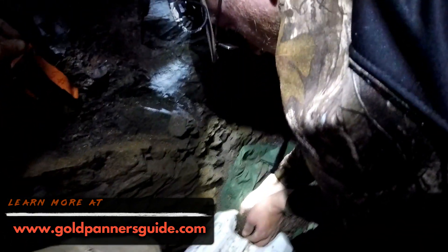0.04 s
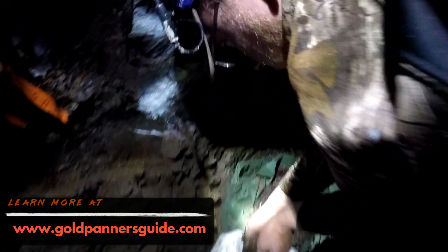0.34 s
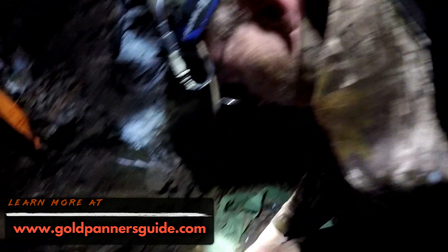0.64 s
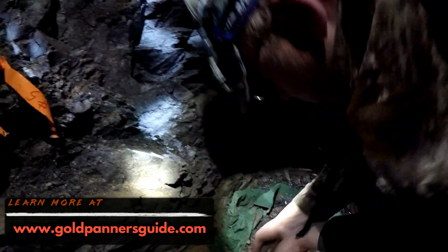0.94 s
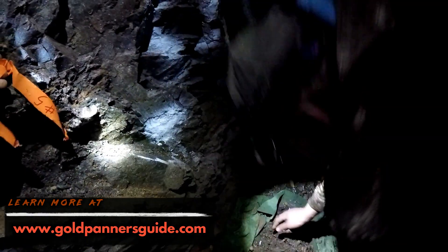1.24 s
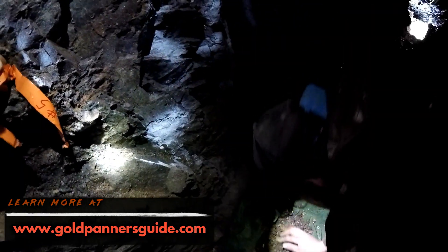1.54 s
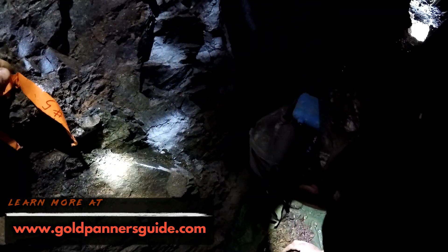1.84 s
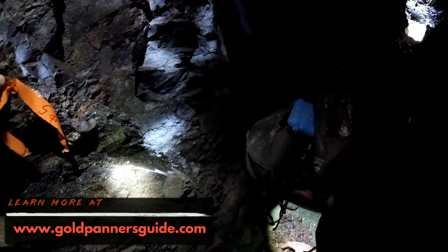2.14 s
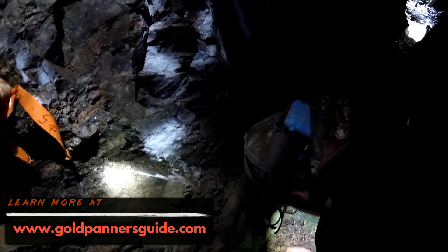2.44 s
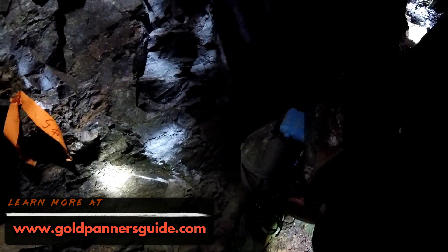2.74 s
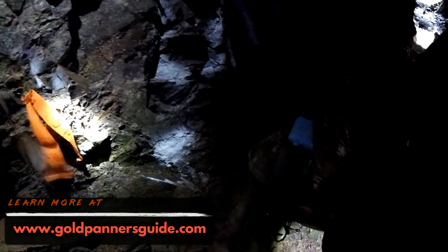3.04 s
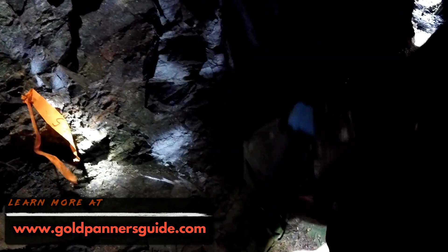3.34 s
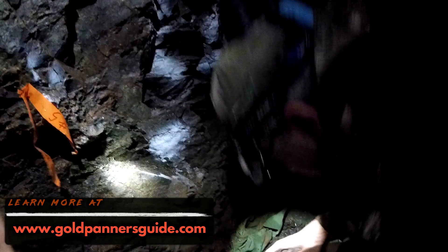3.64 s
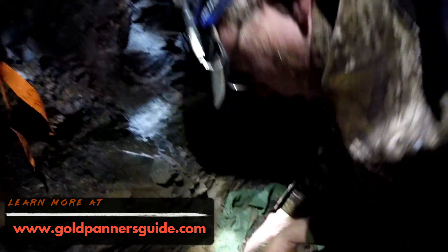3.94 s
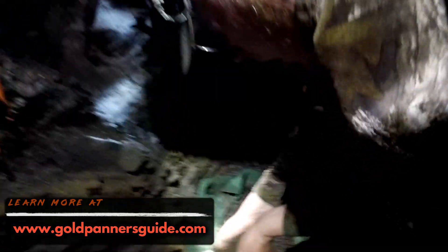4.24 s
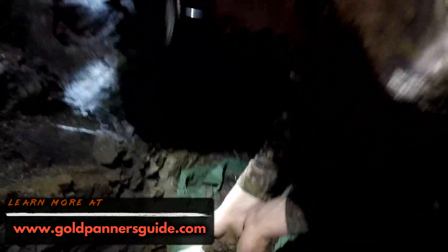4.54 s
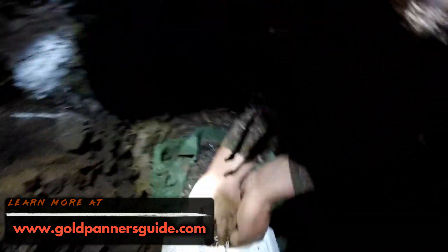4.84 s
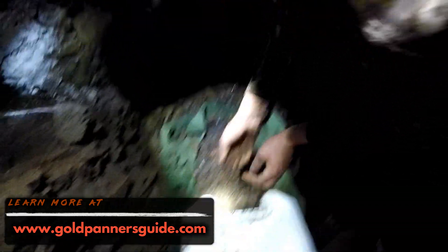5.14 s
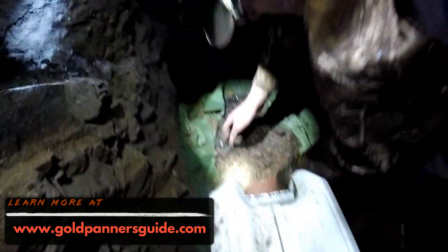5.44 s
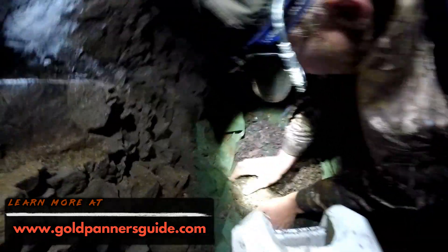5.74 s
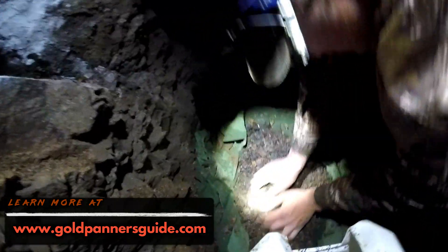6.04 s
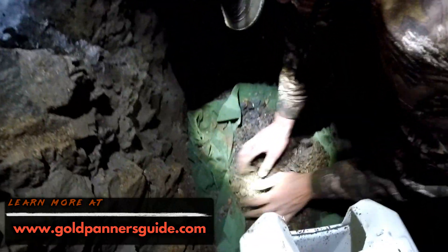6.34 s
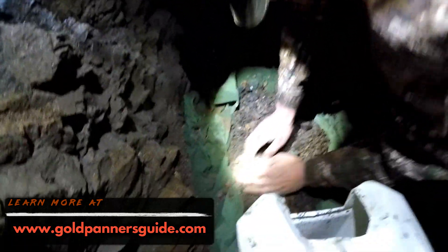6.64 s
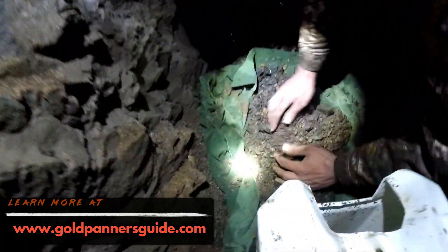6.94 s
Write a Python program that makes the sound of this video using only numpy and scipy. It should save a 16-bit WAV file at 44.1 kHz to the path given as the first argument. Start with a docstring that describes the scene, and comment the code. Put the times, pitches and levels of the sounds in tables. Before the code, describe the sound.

Close up in a narrow mine tunnel, stones clatter into a plastic tub, the heavier lumps making it boom, with a few muffled bumps underneath. A quieter stretch follows, with fingers sweeping gravel across a tarp and small chips ticking. The tub drags slightly and more handfuls rattle and thump in, before hands scrape into the pile again. The rock walls hold the low tones for seconds.

```python
"""A short scrape of grit, then handfuls of broken ore tumble into a hollow plastic container. Stones rattle on
its walls, heavy lumps make it boom, and a narrow mine tunnel holds the lows for seconds. Dull, close bumps and
a swell of rumble run under this first pour. Hands rake fine grit together on the rock floor and loose chips
click; the plastic judders as it is dragged, a second round of ore goes in, and the hands dig back into the heap
on the tarp."""
import sys
import numpy as np
from scipy import signal
from scipy.fft import rfft, irfft
from scipy.io import wavfile
from scipy.ndimage import uniform_filter1d

SR = 44100
rng = np.random.default_rng(int(sys.argv[2]) if len(sys.argv) > 2 else 0)


def dump(signal):
    """Clip the signal to [-1, 1] and save it as 16-bit WAV at the path in sys.argv[1]."""
    limited = np.clip(np.atleast_2d(signal).T, -1, 1)
    pcm = np.round(limited * 32767).astype(np.int16)
    wavfile.write(sys.argv[1], SR, pcm)


N = 307818
T = np.arange(N) / SR

# Table levels are relative: each layer gets its own trim in the mix. hand strokes, on the rock floor and later
# on the tarp: start_s, length_s, scrape_db, grit_db, depth (0 sweeping to 1 digging)
HAND_STROKES = [(0.0, 0.37, -42.5, -49.5, 0.52), (1.57, 0.056, -48.5, -54, 0),
                (1.685, 0.04, -44.5, -61, 0.41), (1.917, 0.3, -43.5, -47.5, 0),
                (2.255, 0.059, -46.5, -52.5, 0), (2.372, 0.13, -50.5, -59, 0.13),
                (2.536, 0.16, -42, -50, 0.045), (2.724, 0.34, -45, -50, 0.048),
                (3.136, 0.098, -40.5, -48, 0.043), (3.291, 0.2, -50, -54, 0), (3.458, 0.15, -49, -47.5, 0),
                (3.659, 0.032, -44, -45.5, 0.4), (3.75, 0.09, -69, -59, 0.21), (3.92, 0.12, -68, -66, 0),
                (4.08, 0.015, -39.5, -58, 0.63), (4.167, 0.088, -31.5, -49, 0.9),
                (4.337, 0.017, -43.5, -45, 0.76), (5.85, 0.23, -40.5, -61, 0.84),
                (6.101, 0.23, -32, -46, 0.9), (6.324, 0.35, -32.5, -42, 0.8),
                (6.665, 0.11, -48, -51.5, 0.39), (6.87, 0.17, -40.5, -54, 0.74)]
# handfuls running into the container: start_s, swell_s, length_s, rattle_db, grit_db, boom_db, boom_hz
POURS = [(0.154, 0.08, 0.14, -23.5, -35.5, -15.5, 162), (0.265, 0.078, 0.33, -22, -35, -12.5, 160),
         (0.609, 0.028, 0.29, -24.5, -37, -16, 161), (0.911, 0.01, 0.21, -26, -37.5, -7.5, 163),
         (1.155, 0.023, 0.21, -26.5, -39, -10.5, 160), (1.447, 0.0037, 0.012, -26.5, -41.5, -15, 158),
         (4.392, 0.18, 0.21, -21, -35.5, -13.5, 225), (4.643, 0.03, 0.26, -24, -37, -12.5, 142),
         (4.88, 0.093, 0.29, -20.5, -34.5, -9, 157), (5.21, 0.031, 0.17, -27, -41, -21, 150.6),
         (5.388, 0.012, 0.055, -29.5, -41.5, -6.5, 142)]
# modes of the container's air and walls: pitch_hz, level_db, t60_s
CONTAINER_MODES = [(132.7, -6.5, 0.87), (158.15, 2, 0.39), (186, -0.5, 0.17), (241, -4.5, 0.28),
                   (267, -5, 0.14), (345, -11, 0.63), (367, -16.5, 0.45), (454, -16, .11), (530, -23, .1)]
# lumps striking the container: start_s, clack_db, clack_hz, boom_db, boom_hz, crack_db
LUMP_HITS = [(0.161, -17.5, 800, -36, 174, -48), (0.18, -8, 798, -4, 174, -42),
             (0.234, -10.5, 993, -12, 159, -25), (0.352, -19, 1030, -6, 153, -17),
             (0.395, -10, 460, -4, 168, -31), (0.647, -9, 1784, -18, 151.2, -19.5),
             (0.934, -11.5, 520, -6, 158, -39), (0.967, -13, 557, -8, 157, -43),
             (1.001, -12.5, 530, -12, 145, -43), (1.05, -9.5, 562, -7.5, 164, -36),
             (1.16, -16, 493, -4, 160, -32), (1.241, -15, 520, -5, 150, -40),
             (1.33, -13.5, 530, 0, 161, -30), (1.451, -14, 567, -6.5, 158, -33),
             (4.175, -19.5, 553, -14.5, 272, -37), (4.349, -25, 590, -32, 207, -40),
             (4.376, -37, 490, -14.5, 207, -37), (4.389, -14.5, 807, -15.5, 149, -18.5),
             (4.4957, -11.5, 660, -8, 231, -25), (4.541, -14, 527, -12, 320, -41),
             (4.625, -14, 560, -3, 258, -31), (4.649, -11, 1440, 0.5, 134, -23),
             (4.7418, -6, 560, -1.5, 149, -23), (4.884, -7.5, 541, -8, 153, -21),
             (4.9516, -9, 503, -6.5, 155.7, -30), (5.119, -11.5, 1644, -6, 166.3, -37),
             (5.394, -10, 476, -24, 151, -34), (5.435, -14, 560, 1.5, 148, -19),
             (5.543, -17.5, 515, -23, 145, -29.5), (5.61, -8, 488, -13.5, 142, -23.5),
             (5.708, -7.5, 519, 0.5, 265, -29), (5.735, -30, 525, -0.5, 250, -53)]
# chips clicking on rock: start_s, level_db, pitch_hz
CHIP_CLICKS = [(0.1755, -22.5, 4000), (1.5813, -34, 3480), (1.6362, -38, 4450), (1.7221, -25, 5340),
               (1.7338, -33, 4880), (1.7686, -34.5, 4230), (1.8742, -41, 6450), (1.942, -37, 5994),
               (3.1742, -33, 6030), (3.5602, -29, 4200), (3.6066, -30.5, 5320), (3.675, -25, 5330),
               (3.779, -32.5, 5530), (3.8226, -34, 5900), (3.856, -39, 3900), (3.959, -39, 4480),
               (4.0871, -41, 3990), (4.112, -37, 4300), (4.338, -34, 6100), (4.387, -33, 4020),
               (4.4205, -29.5, 4140), (4.462, -25, 3720), (4.5197, -23.5, 5450), (4.633, -16, 4200),
               (4.682, -19, 4120), (4.7133, -19.5, 4160), (4.7604, -20.5, 4150), (5.026, -18, 3720),
               (5.39, -21.5, 5900), (5.654, -33, 6300), (5.705, -29, 3830), (5.7716, -40.5, 3840),
               (5.9008, -39.5, 4760), (5.9274, -42, 4400)]
# dull, close bumps: start_s, level_db
CLOSE_BUMPS = [(0.589, -5.5), (0.609, -10), (0.6741, -4), (0.688, -10), (0.73, -5.5), (0.757, -7),
               (0.789, -4.5), (0.8164, -7), (0.8368, -12.5), (0.8671, -5.5), (0.89, -9)]
# stick-slip curve of the dragged plastic: time_s, level_db, slips_per_s
DRAG_CURVE = [(4.37, -47.5, 48), (4.441, -44.5, 58.7), (4.498, -41, 57.7), (4.602, -39, 80),
              (4.656, -42, 109)]
# the tunnel's reverb: frequency_hz, t60_s, level_db, build_up_s
TUNNEL_REVERB = [(37.8, 3.3, -10, 0.35), (62, 3.5, -1.5, 0.44), (92.6, 2.35, -6, 0.11),
                 (150, 2.11, -2, 0.012), (230, 1.58, -2.5, 0.012), (312, 0.99, -8.5, 0.0033),
                 (464, 0.55, -6, 0.0011), (1100, 0.5, -6.5, 0.0015), (3000, 0.39, -11.5, 0.0065),
                 (8000, 0.41, -11.5, 0.0033)]

# EQ curves, one for each texture: frequency_hz, gain_db
SWEEP_EQ = [(80, 5.5), (180, 9.5), (380, 9.5), (650, 5.5), (950, -1.5), (1300, 1), (1900, 1), (2450, -3.5),
            (3100, -38.5), (6000, -17.5)]  # fingers skimming the dirt
DIG_EQ = [(80, -9.5), (170, 12), (250, 8), (450, 1), (650, -2), (980, 0), (1250, -6.5), (1650, -8.5),
          (2300, -18), (3100, -12), (6000, -36)]  # fingers deep in the heap
GRIT_EQ = [(1200, -12.5), (2500, 5.5), (3500, 2), (4700, 0), (5700, -0.5), (6250, 0), (7000, -8),
           (9000, -12.5), (11000, -15), (11800, -25), (13000, -17), (15000, -36)]  # bright, fine grit
AIR_EQ = [(30, 3), (90, -17.5), (170, 1.5), (350, -4), (700, -11.5), (1500, -13), (4000, -23.5),
          (6200, -23.5), (7500, -26), (11000, -32), (15000, -59)]  # the tunnel's room tone
RATTLE_EQ = [(100, -25), (300, 4), (480, 1), (650, -2.5), (950, 1.5), (1150, -2.5), (1400, -2.5),
             (1750, -0.5), (2100, -8), (2700, -9), (4000, -21.5), (8000, -52.5)]  # stones on plastic
CLACK_EQ = [(90, -40.5), (280, 8), (450, 5.5), (700, -1), (950, 2.5), (1150, -2.5), (1400, 0), (1700, -9),
            (2500, -9.5), (4000, -27), (9000, -46)]  # a lump landing on ore
SPLINTER_EQ = [(400, 3), (2000, 5), (4500, 3), (6400, 3), (7500, -3.5), (11000, -9.5), (12000, -12),
               (15000, -25)]  # chips on rock
RUMBLE_EQ = [(10, -40), (25, 10), (45, 14.5), (70, -4.5), (110, -29), (250, -16), (1000, -86)]
SLIP_TICK_EQ = [(9000, -49), (11300, -25), (12000, -1), (14000, -8), (15500, -9)]
SLIP_KNOCK_EQ = [(150, 2.5), (280, -0.5), (420, -7.0), (700, -19.5), (3000, -30), (9000, -60)]


def undb(db):
    """Decibels to gain."""
    return 10 ** (np.asarray(db) / 20)


def unit(x):
    """Scale to rms 1."""
    return x / np.sqrt(np.mean(x ** 2))


def fade(t60):
    """One second of exponential decay."""
    return np.exp(-np.log(1000) * T[:SR] / t60)


def ring(hz, t60):
    """One struck resonance: a dying sine."""
    return np.sin(2 * np.pi * hz * T[:SR]) * fade(t60)


def burst(t60):
    """The crunch of one contact: a quickly dying spray of noise."""
    return rng.standard_normal(SR) * fade(t60)


def add(out, start_s, sound):
    """Mix a sound in at its cue."""
    i = max(int(start_s * SR), 0)
    out[i:i + len(sound)] += sound[:N - i]


def colour(x, eq, size=2048):
    """Shape a sound with an EQ curve, as a minimum-phase filter of unit energy."""
    hz, db = np.transpose(eq)
    grid_hz = np.linspace(1, SR / 2, size + 1)
    gain = undb(np.interp(np.log(grid_hz), np.log(hz), db))
    cepstrum = irfft(np.log(gain))[:size]
    cepstrum[1:] *= 2
    response = irfft(np.exp(rfft(cepstrum, 2 * size)))[:size]
    return signal.oaconvolve(x, response / np.linalg.norm(response))[:len(x)]


def gesture(start_s, length_s, rise_s, sag_db_per_s, fall_s):
    """Envelope of one movement: it swells, holds while sagging a little, and dies away."""
    age = T[:SR]
    attack = np.clip(age / rise_s, 0, 1)
    sag = undb(-sag_db_per_s * np.minimum(age, length_s))
    release = np.exp(-np.maximum(age - length_s, 0) / fall_s)
    out = np.zeros(N)
    add(out, start_s, attack * sag * release)
    return out


def clumps(per_s, depth_db):
    """A gain that wanders in smoothed random steps, like loose ore moving in little slides."""
    steps = np.repeat(rng.standard_normal(N // 100), int(SR / per_s))[:N]
    return undb(depth_db * uniform_filter1d(steps, size=150))


def impacts(per_s, spread_db):
    """Random collisions: many small ones, a few large."""
    count = int(per_s * N / SR)
    when, size = rng.random((count, 2)).T
    heft = undb(spread_db * np.minimum(-np.log(1 - size), 4))
    polarity = (-1) ** np.arange(count)
    return np.bincount((when * N).astype(int), heft * polarity, N)


def gravel(per_s, spread_db, cycles, ring_gain, sizes=24):
    """Stones of many sizes collide; each ticks and rings for a few cycles at its own pitch."""
    out, t = 0, T[:1500]
    for hz in np.geomspace(600, 11000, sizes) * rng.uniform(.94, 1.06, sizes):
        stone = ring_gain * hz / SR * np.sin(2 * np.pi * hz * t) * np.exp(-hz * t / cycles)
        stone[0] += 1  # the tick
        out = out + signal.oaconvolve(impacts(per_s / sizes, spread_db), stone)[:N]
    return out


def raking():
    """Fingers push dense fine grit about; digging into the heap sounds deeper than sweeping."""
    sweep, dig, grit = np.zeros((3, N))
    for start_s, length_s, scrape_db, grit_db, depth in HAND_STROKES:
        # the hand speeds up, eases off, and the grit settles
        speed = gesture(start_s, length_s, rise_s=0.41 * length_s, sag_db_per_s=10, fall_s=0.045)
        sweep += (1 - depth) * undb(scrape_db) * speed
        dig += depth * undb(scrape_db) * speed
        grit += undb(grit_db) * speed
    coarse = gravel(per_s=3000, spread_db=4.5, cycles=3.0, ring_gain=5.2)
    fine = gravel(per_s=6000, spread_db=3.5, cycles=10.3, ring_gain=0.79)
    scrape = sweep * unit(colour(coarse, SWEEP_EQ)) + dig * unit(colour(coarse, DIG_EQ))
    sizzle = grit * unit(colour(fine, GRIT_EQ))
    return clumps(per_s=30, depth_db=0.5) * (scrape + sizzle)


def room_tone():
    """The tunnel's still air: a faint, steady bed of dark noise."""
    return undb(-50) * unit(colour(rng.standard_normal(N), AIR_EQ))


def rumble():
    """A faint sub rumble sits under everything and swells for as long as the bumps last."""
    lows = unit(colour(rng.standard_normal(N), RUMBLE_EQ))
    first_s, last_s = CLOSE_BUMPS[0][0], CLOSE_BUMPS[-1][0]
    swell = gesture(first_s, last_s - first_s, rise_s=0.15, sag_db_per_s=12.5, fall_s=0.028)
    return (undb(-53) + undb(-20.5) * swell) * lows


def container_boom(pitch_hz, focus_db):
    """A blow wakes mostly the container's modes near its own pitch, set by where and how it lands."""
    modes = np.array([undb(db) * ring(hz, t60) for hz, db, t60 in CONTAINER_MODES])
    mode_hz, mode_db, _ = np.transpose(CONTAINER_MODES)
    share = undb(-focus_db * np.log2(mode_hz / pitch_hz) ** 2)
    return share @ modes / np.linalg.norm(share * undb(mode_db))


def pouring():
    """A stream of ore rattles on the plastic and keeps the hollow booming."""
    slides = clumps(per_s=45, depth_db=2.15)
    coarse = gravel(per_s=750, spread_db=1.5, cycles=8.9, ring_gain=1.6)
    fine = gravel(per_s=4900, spread_db=1.5, cycles=6.9, ring_gain=1.4)
    rattle = unit(slides * colour(coarse, RATTLE_EQ))
    grit = unit(slides * colour(fine, GRIT_EQ))
    blows = impacts(per_s=500, spread_db=4.5)
    out = np.zeros(N)
    for start_s, swell_s, length_s, rattle_db, grit_db, boom_db, boom_hz in POURS:
        # the stream thins as the hand empties, then trickles out
        flow = gesture(start_s, length_s, swell_s, sag_db_per_s=5.5, fall_s=0.055)
        boom = signal.oaconvolve(blows, container_boom(boom_hz, focus_db=18))[:N]
        # level the boom: the weight of the stream drives it, not single stones
        boom /= np.sqrt(uniform_filter1d(boom ** 2, size=2000) + 1e-9)
        out += flow * (undb(rattle_db - 2) * rattle + undb(grit_db) * grit + undb(boom_db - 3.5) * boom)
    return out


def lumps():
    """Each heavy piece cracks, clacks at its own pitch on the ore below and thumps the container."""
    clack, crack, body = np.zeros((3, N))
    snap = 7.9 * signal.unit_impulse(SR)
    for start_s, clack_db, clack_hz, boom_db, boom_hz, crack_db in LUMP_HITS:
        add(clack, start_s, undb(clack_db) * (snap + burst(t60=0.11)))  # hard hit, spray of crumbs
        add(crack, start_s, undb(crack_db) * burst(t60=0.028))
        add(body, start_s, undb(clack_db - 7) * ring(clack_hz, t60=0.06))
        add(body, start_s, undb(boom_db - 5) * container_boom(boom_hz, focus_db=27))
    return undb(-7) * colour(clack, CLACK_EQ) + undb(-4) * colour(crack, GRIT_EQ) + body


def chips():
    """Small splinters crunch, ring very briefly and skid."""
    out = np.zeros(N)
    for start_s, level_db, pitch_hz in CHIP_CLICKS:
        crunch, skid = burst(t60=0.0075), burst(t60=0.025)
        ping = ring(pitch_hz, t60=0.007)
        add(out, start_s, undb(level_db) * (crunch + undb(2.5) * (skid + ping)))
    return undb(-8) * colour(out, SPLINTER_EQ)


def bumps(sweep_hz=1800, floor_hz=28, glide_s=0.00021):
    """In a bending shell the highs arrive first, so each bump sweeps down into a thud."""
    hz = floor_hz + sweep_hz / (1 + T[:SR] / glide_s)
    thud = np.sin(2 * np.pi * np.cumsum(hz) / SR) * fade(t60=0.1)
    out = np.zeros(N)
    for start_s, level_db in CLOSE_BUMPS:
        add(out, start_s, undb(level_db) * thud)
    return out


def judder():
    """Dragged plastic sticks and slips unevenly: each slip gives a thin, high tick and a small knock."""
    time_s, level_db, slips_per_s = np.transpose(DRAG_CURVE)
    rate = np.interp(T, time_s, slips_per_s) * clumps(per_s=76, depth_db=4)
    force = np.interp(T, time_s, undb(level_db), left=0, right=0) * clumps(per_s=120, depth_db=4)
    slip_count = np.floor(np.cumsum(rate) / SR)
    slips = np.diff(slip_count, prepend=0) * force * np.sqrt(SR / np.mean(slips_per_s))
    return undb(-11) * colour(slips, SLIP_TICK_EQ) + undb(23.5) * colour(slips, SLIP_KNOCK_EQ)


def tunnel(x, bands=22):
    """Rock walls return a diffuse echo: treble dies quickly, the lows come late and roll on."""
    hz, *columns = np.transpose(TUNNEL_REVERB)
    t = T[:4 * SR]
    edges = np.geomspace(25, 16000, bands + 1)
    spectrum = rfft(rng.standard_normal(len(t)))
    bin_hz = np.arange(len(spectrum)) * SR / len(t)
    echo = np.zeros(len(t))
    for lo, hi in zip(edges, edges[1:]):
        t60, level_db, build_s = (np.interp(np.log(lo * hi) / 2, np.log(hz), c) for c in columns)
        band = irfft(spectrum * ((bin_hz >= lo) & (bin_hz < hi)))
        band *= np.exp(-np.log(1000) * t / t60) * (1 - np.exp(-t / build_s)) ** 2
        echo += band / np.linalg.norm(band) * np.sqrt(2 * (hi - lo) / SR) * undb(level_db)
    return signal.fftconvolve(x, echo)[:N]


def scene():
    """Mix the close ore and bumps with their tunnel reverb, over rumble and room tone."""
    ore = pouring() + raking() + lumps() + chips() + judder()
    thuds = bumps()
    # close by there is little below the container's lowest mode; those lows build up only in the tunnel
    low_cut = signal.butter(8, 122, "high", fs=SR, output="sos")
    close = signal.sosfilt(low_cut, ore)
    air = room_tone()
    reverb = tunnel(ore + undb(-10) * thuds)
    return (close + thuds + reverb + rumble() + air)[None]


def record(dry, top_hz=15250):
    """Soft-clip the highest peaks and cut the very top."""
    rounded = dry / (1 + dry ** 6) ** (1 / 6)
    high_cut = signal.ellip(8, .2, 70, top_hz, fs=SR, output="sos")
    return signal.sosfilt(high_cut, rounded)


dry = scene()
out = record(dry)
dump(out)
```